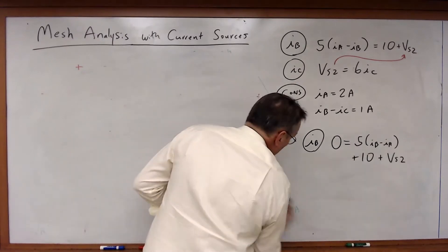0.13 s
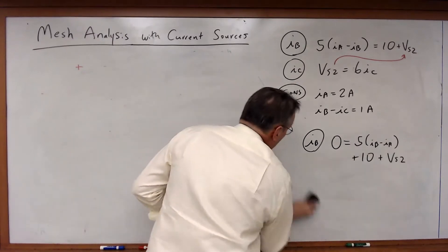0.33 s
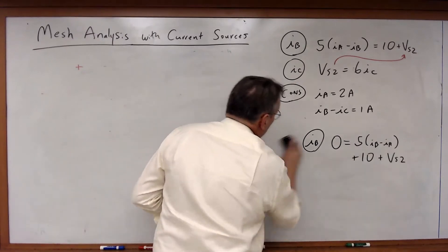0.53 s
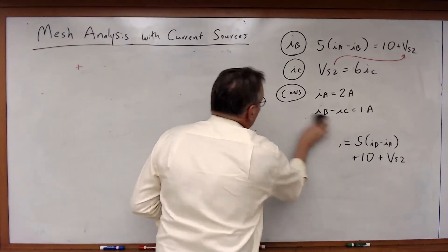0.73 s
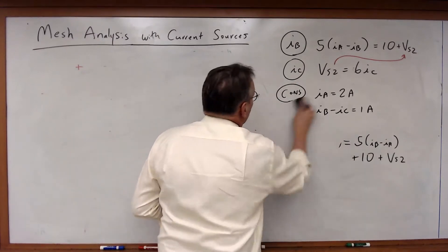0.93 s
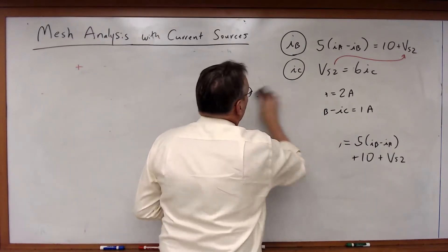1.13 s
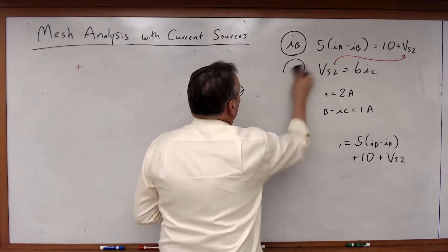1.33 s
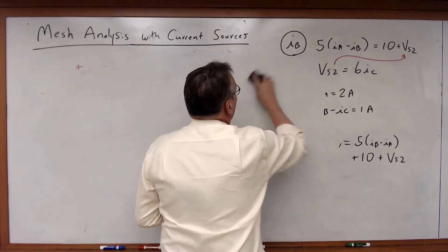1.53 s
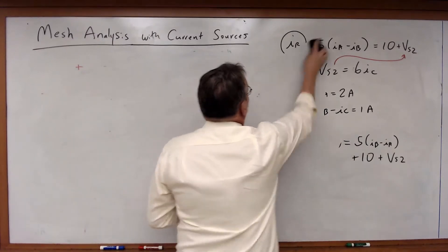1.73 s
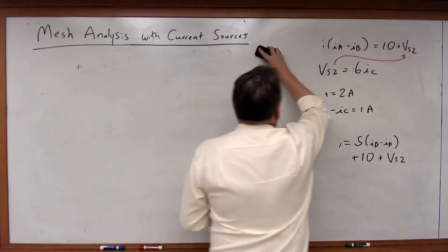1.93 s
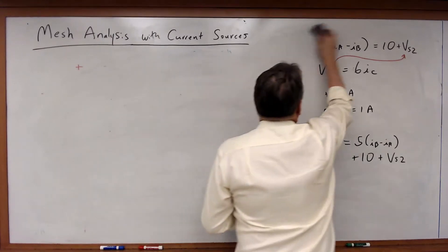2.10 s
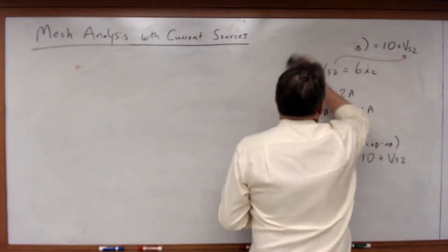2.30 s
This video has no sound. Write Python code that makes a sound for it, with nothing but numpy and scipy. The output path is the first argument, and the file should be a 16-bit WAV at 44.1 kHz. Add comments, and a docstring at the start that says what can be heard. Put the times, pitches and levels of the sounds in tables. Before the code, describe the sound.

A felt eraser wipes a wall-mounted whiteboard in rapid dry strokes, over five a second, with low board thumps and small holder clacks at the turns, in a lightly reverberant classroom, heard centrally over faint room noise.

```python
"""In a classroom, a felt eraser is wiped to and fro over a wall-mounted whiteboard, over five strokes a second.
The felt is banded noise that swells with each stroke; the drag adds banded noise for scrub and rumble.
The eraser rocks near the turns: decaying sines make the board thump and the holder clack.
Short stick-slip tones and one tick join in; room noise, faint panel ringing and reverberation lie beneath.
The microphone picture is central: both channels are alike."""
import sys
import numpy as np
from scipy import signal
from scipy.io import wavfile
from scipy.ndimage import map_coordinates

SR = 44100
rng = np.random.default_rng(int(sys.argv[2]) if len(sys.argv) > 2 else 0)


def to_wav(s):
    """Save 16-bit WAV."""
    ch = np.atleast_2d(s).T  # columns
    pcm = np.round(np.clip(ch, -1, 1) * 32767)  # PCM
    wavfile.write(sys.argv[1], SR, pcm.astype(np.int16))


N = 104031
TIME = np.arange(N) / SR

# Wipes across the board. Each row: start, hardest press and end in seconds, level in dB,
# rasp near 3 kHz in dB, treble above about 8 kHz in dB, notch in Hz.
STROKES = [(-.05, 0.027, 0.085, -60.5, 3, 7, 2250), (0.07, 0.207, 0.27, -57, -3, 0, 2120),
           (0.279, .445, 0.49, -58.5, 1, 2.5, 2600), (0.494, 0.582, 0.69, -58, 1, -1, 3600),
           (0.698, 0.85, 0.85, -59.5, 1.5, 0, 4000), (0.873, 0.918, 1.028, -56.5, 2.5, -4.5, 4020),
           (1.037, 1.164, 1.195, -59.5, 5, 2, 4300), (1.216, 1.254, 1.41, -55, 2.5, -4, 4400),
           (1.397, 1.53, 1.594, -61.5, 3.5, 0, 5200), (1.593, 1.635, 1.805, -56, -0.5, -2.5, 5450),
           (1.77, 1.885, 1.933, -64.5, 3.5, 1.5, 7400), (1.956, 2.084, 2.21, -61, 5, 1.5, 7050),
           (2.186, 2.292, 2.36, -64, 5, 6, 7200)]
RISE_POWER, FALL_POWER = 1.0, 1.3   # shape of the swell before and after its peak
TREBLE_POWER, TREBLE_CENTRING = 1.27, 0.46   # treble swells are narrower, and nearer to mid-stroke
RASP_HZ, RASP_OCTAVES, TREBLE_HZ = 3270, 0.64, 7700
# Sound by two paths cancels at a notch, placed anew for each stroke, and adds up just above it.
NOTCH_DB, NOTCH_WIDTH_HZ = -5.5, 500
LOBE_DB, LOBE_ABOVE_HZ, LOBE_WIDTH_HZ = 2, 1760, 770

# Colour of felt on the board. Each row: frequency in Hz, density in dB per Hz.
FELT_SPECTRUM = [(900, -8), (2000, -9), (2450, -1), (2900, 1.5), (3900, 0), (5000, 0.5), (6400, -0.9),
                 (7700, -3), (9200, -8), (12000, -15), (15500, -22)]
FELT_DB, FELT_PATCHY_DB, FIBRE_GRAIN_DB = 0.1, 1.27, 1.0
# A near reflection, about 1.1 m longer in path, wandering as the arm moves.
ECHO_S, ECHO_SWING_S, ECHO_SHARE = 0.0032, 0.0002, 0.29

# Holder scrubbing on the panel. Each row: time in seconds, level in dB.
SCRUB_LEVEL = [(0, -63.5), (.26, -63.5), (.42, -60), (.53, -60.5), (.68, -58.5), (.87, -64), (1.0, -58),
               (1.08, -63), (1.2, -59), (1.35, -60.5), (1.4, -61.5), (1.53, -58.5), (1.75, -61),
               (1.9, -60.5), (2.12, -56), (2.36, -60)]
# Colour of that scrubbing. Each row: frequency in Hz, density in dB per Hz.
SCRUB_SPECTRUM = [(120, 0.5), (220, 4), (370, 1), (520, -6.5), (640, -4.5), (1150, -5), (1800, -8),
                  (2800, -17.5), (6000, -31)]
SCRUB_GRAIN_DB, SCRUB_PATCHY_DB = 1.47, 3
# Panel resonances fed by the scrubbing. Each row: frequency in Hz, width in Hz, level in dB re the scrub noise.
PANEL_MODES = [(392, 34, -20.5), (629.4, 54, -11), (761, 100, -16.5), (1104, 43, -16), (1227, 52, -17)]

# Flexing of the panel. Each row: time in seconds, level in dB.
RUMBLE_LEVEL = [(0, -54.5), (.13, -54.5), (.23, -52.5), (.32, -62), (.59, -60.5), (.66, -53.5),
                (.71, -49.5), (.78, -53.5), (.9, -61), (.98, -59), (1.06, -60), (1.32, -63), (1.37, -49.5),
                (1.53, -55), (1.68, -52), (1.87, -50), (2.1, -53.5), (2.36, -52)]
# Colour of the flexing. Each row: frequency in Hz, density in dB per Hz.
RUMBLE_SPECTRUM = [(20, -7.5), (35, 2), (55, -0.5), (80, -4.5), (120, -9), (180, -15.5), (300, -24),
                   (600, -43)]

# Room noise. Each row: frequency in Hz, density in dB per Hz.
ROOM_SPECTRUM = [(25, -2), (60, -4.5), (150, -2.5), (400, -14), (1000, -17), (2500, -21), (6000, -28.5),
                 (10000, -34), (15500, -45.5)]
ROOM_NOISE_DB = -61
# Faint steady ringing of the panel. Each row: frequency in Hz, width in Hz, level in dB.
PANEL_RINGING = [(619, 18, -75.5), (1100, 8.6, -85), (2940, 5.5, -89.5)]

# Board thumps. Each row: start in seconds, level in dB, pitch in Hz, ring in cycles to -60 dB.
THUMPS = [(.015, -41.5, 114, 7), (0.0633, -35, 56.3, 3.5), (0.066, -48, 172, 1), (0.4551, -39, 186, 2),
          (0.7273, -39.5, 160, 1.5), (.7755, -31, 198, 2), (0.991, -43.5, 74.6, 1.5),
          (1.335, -40.5, 151, 1.5), (1.447, -39.5, 84, 4), (1.6038, -32, 214, 2.5), (1.612, -33.5, 71, 5.5),
          (1.765, -43, 108, 10), (1.779, -47, 264, 7.5), (2.058, -33.5, 120, 4), (2.1998, -29, 125, 6.5),
          (2.299, -34, 232, 3.5), (2.303, -35.5, 94, 3)]
THUMP_RISE_CYCLES, THUMP_RISE_POWER = 0.38, 1.36
ROOM_T60_S, ROOM_DB, ROOM_DULL_HZ = 0.78, -16, 7000   # the classroom's reverberation

# Holder clacks. Each row: start in seconds, level in dB, contact hardness as a low-pass in Hz.
CLACKS = [(.675, -45, 1200), (.726, -42.5, 1600), (.7742, -42.5, 3200), (.99, -45, 1000),
          (1.441, -52, 1800), (1.569, -48, 2400), (1.78, -52, 900), (2.199, -45.5, 2000),
          (2.2969, -34, 3800)]
# Modes of the holder. Each row: frequency in Hz, level in dB, decay to -60 dB in seconds.
HOLDER_MODES = [(670, -12.5, 0.014), (993, -1, 0.0094), (1320, -2.5, 0.0055), (2400, -4.5, .008),
                (3420, -24, .005)]

# A thin high tick as the eraser turns.
TICK_MIDDLE_S, TICK_HALF_S, TICK_DB = 0.848, 0.004, -68
TICK_LOW_HZ, TICK_HIGH_HZ = 10500, 14600

# Felt sticking and slipping during a stroke. Each row: middle in seconds, half length in seconds,
# pitch in Hz, level in dB.
JUDDERS = [(1.015, 0.0068, 748, -53.5), (1.445, .008, 1250, -58), (1.732, 0.006, 870, -55.5)]
JUDDER_WOBBLE = 0.039   # spread of the pitch, as a share of it
CUTOFF_HZ = 15700


def from_db(db):
    """Decibels to gain."""
    return 10 ** (np.asarray(db) / 20)


def rms_one(x):
    """Scale to rms 1."""
    return x / np.sqrt(np.mean(x ** 2) + 1e-20)


def level(rows):
    """Gain over time from (s, dB) points."""
    return from_db(np.interp(TIME, *np.transpose(rows)))


def bell(offset, width):
    """Bell curve of height 1."""
    return np.exp(-0.5 * (offset / width) ** 2)


def filtered(x, hz, kind, order=2):
    """Butterworth filter."""
    safe_hz = np.clip(hz, 10, 0.45 * SR)
    return signal.sosfilt(signal.butter(order, safe_hz, kind, fs=SR, output="sos"), x)


def resonate(x, hz, width):
    """One resonance, scaled to rms 1."""
    r = np.exp(-np.pi * width / SR)
    poles = [1, -2 * r * np.cos(2 * np.pi * hz / SR), r * r]
    return rms_one(signal.lfilter([1, 0, -1], poles, x))


def drift(rate):
    """Smooth chance with spread 1, made at a tenth of the sample rate; rate in Hz."""
    r = np.exp(-20 * np.pi * rate / SR)
    white = rng.standard_normal(N // 10 + 4002)
    slow = signal.lfilter([1], [1, -2 * r, r * r], white)[4000:]   # drop the settling
    return np.interp(np.arange(N) / 10, np.arange(len(slow)), rms_one(slow))


def grain(depth_db, rate):
    """Uneven catching of a rubbed surface, as a gain of rms 1."""
    return rms_one(from_db(depth_db * drift(rate)))


def noise_bands(spectrum, count):
    """Noise as a list of (centre Hz, band), with a total rms of about 1."""
    points_hz, points_db = np.transpose(spectrum)
    edges = np.geomspace(points_hz[0], points_hz[-1], count + 1)
    centres = np.sqrt(edges[1:] * edges[:-1])
    gains = from_db(np.interp(np.log(centres), np.log(points_hz), points_db))
    gains = gains / np.sqrt(np.sum(gains ** 2 * np.diff(edges)) * 2 / SR)
    white = rng.standard_normal((2, N + SR // 10))   # neighbouring bands take unrelated noise
    bands = []
    for k in range(count):
        band = filtered(white[k % 2], edges[k:k + 2], "band")[-N:]
        bands.append((centres[k], gains[k] * band))
    return bands


def stroke_swell(start, peak, end):
    """The hand builds up from one turn and eases into the next."""
    phase = np.interp(TIME, [start, peak, end], [0, 0.5, 1])
    return np.abs(np.sin(np.pi * phase)) ** np.where(phase < 0.5, RISE_POWER, FALL_POWER)


def felt():
    """Countless fibres slip: the hiss swells with pressure, its treble with the speed nearer mid-stroke."""
    start, press, end, db, rasp_db, treble_db, notch_hz = np.transpose(STROKES)
    fastest = press + TREBLE_CENTRING * ((start + end) / 2 - press)
    pressures = np.array([stroke_swell(*times) for times in zip(start, press, end)])
    speeds = np.array([stroke_swell(*times) for times in zip(start, fastest, end)]) ** TREBLE_POWER
    hiss = np.zeros(N)
    for hz, band in noise_bands(FELT_SPECTRUM, count=34):
        rasp = bell(np.log2(hz / RASP_HZ), RASP_OCTAVES)
        treble = 1 / (1 + (TREBLE_HZ / hz) ** 10)
        notch = NOTCH_DB * bell(hz - notch_hz, NOTCH_WIDTH_HZ)
        lobe = LOBE_DB * bell(hz - notch_hz - LOBE_ABOVE_HZ, LOBE_WIDTH_HZ)
        gains = from_db(db + rasp * rasp_db + treble * treble_db + notch + lobe)   # one per stroke
        swell = (1 - treble) * (gains @ pressures) + treble * (gains @ speeds)
        hiss += band * swell * from_db(FELT_PATCHY_DB * drift(5.5))
    hiss = hiss * grain(FIBRE_GRAIN_DB, 220)
    lag = ECHO_S + ECHO_SWING_S * drift(1.5)
    echo = map_coordinates(hiss, [(TIME - lag) * SR], order=3)
    return from_db(FELT_DB) * (hiss + ECHO_SHARE * echo)


def scrub():
    """The dragging pad shakes its holder and the panel in small uneven slips."""
    body, rings = np.zeros(N), np.zeros(N)
    for _, band in noise_bands(SCRUB_SPECTRUM, count=16):
        body += band * from_db(SCRUB_PATCHY_DB * drift(15.5))
    for hz, width, db in PANEL_MODES:
        rings += from_db(db) * resonate(rng.standard_normal(N), hz, width)
    return level(SCRUB_LEVEL) * rms_one(body + rings) * grain(SCRUB_GRAIN_DB, 120)


def rumble():
    """The panel flexes under the moving hand: low banded noise."""
    return level(RUMBLE_LEVEL) * sum(band for _, band in noise_bands(RUMBLE_SPECTRUM, count=9))


def room_noise():
    """Steady banded noise of the room."""
    return from_db(ROOM_NOISE_DB) * sum(band for _, band in noise_bands(ROOM_SPECTRUM, count=16))


def panel_ringing():
    """Faint steady ringing of the panel: noise through three narrow resonances."""
    return sum(from_db(db) * resonate(rng.standard_normal(N), hz, width) for hz, width, db in PANEL_RINGING)


def thumps():
    """The padded eraser bumps the board, which gives a few dying swings."""
    out = np.zeros(N)
    for start, db, hz, ring_cycles in THUMPS:
        cycles = np.maximum(TIME - start, 0) * hz
        rise = (1 - np.exp(-cycles / THUMP_RISE_CYCLES)) ** THUMP_RISE_POWER
        swell = rise * from_db(-60 * cycles / ring_cycles)
        out += from_db(db) * swell / (swell.max() + 1e-12) * np.sin(2 * np.pi * cycles)
    return out


def classroom(x):
    """Feedback delays of unrelated lengths give a short, dull reverberation."""
    out = np.zeros(N)
    lags = (rng.uniform(0.016, 0.062, 10) * SR).astype(int)
    for k, lag in enumerate(lags):
        loop = x.copy()
        gain = np.exp(-np.log(1000) * lag / SR / ROOM_T60_S)
        for i in range(lag, N, lag):
            loop[i:i + lag] += gain * loop[i - lag:i][:N - i]
        out += (loop - x) * (-1) ** k   # echoes only, with alternating sign
    return from_db(ROOM_DB) * filtered(out, ROOM_DULL_HZ, "low", order=1) / np.sqrt(10)


def clacks():
    """The holder tips against the board and rings briefly; a soft contact is duller."""
    out = np.zeros(N)
    for start, db, contact_hz in CLACKS:
        age = np.maximum(TIME - start, 0)
        ring = np.zeros(N)
        for hz, mode_db, t60 in HOLDER_MODES:
            decay = np.exp(-np.log(1000) * np.minimum(age / t60, 10))
            gain = from_db(db + mode_db + rng.normal(0, 1))   # no two contacts are alike
            pitch = hz * rng.normal(1, 0.035)
            ring += gain * decay * np.sin(2 * np.pi * pitch * age)
        out += filtered(ring, contact_hz, "low")
    return out


def tick():
    """One thin, high tick: a brief swell of treble noise."""
    noise = rms_one(filtered(rng.standard_normal(N), (TICK_LOW_HZ, TICK_HIGH_HZ), "band"))
    return from_db(TICK_DB) * np.exp(-((TIME - TICK_MIDDLE_S) / TICK_HALF_S) ** 2) * noise


def judders():
    """The felt sticks and slips during a stroke: brief chattering tones of unsteady pitch."""
    out = np.zeros(N)
    for middle, half, hz, db in JUDDERS:
        turns = np.cumsum(hz * (1 + JUDDER_WOBBLE * drift(101))) / SR
        swell = np.exp(-((TIME - middle) / half) ** 2)
        out += from_db(db) * swell * np.sin(2 * np.pi * turns)
    return out


def scene():
    """Everything sits in the centre; felt, scrub, clacks, tick and judders feed the reverberation."""
    wiping = felt() + scrub() + clacks() + tick() + judders()
    mid = wiping + classroom(wiping) + rumble() + thumps() + room_noise() + panel_ringing()
    return np.array([mid, mid])


def record(dry):
    """The top is cut steeply."""
    return signal.sosfilt(signal.ellip(10, 0.2, 70, CUTOFF_HZ, fs=SR, output="sos"), dry)


dry = scene()
out = record(dry)
to_wav(out)
```